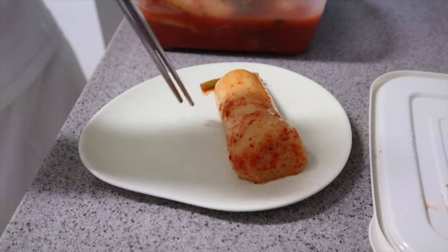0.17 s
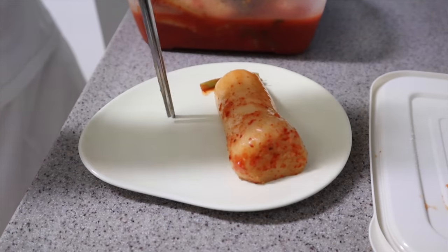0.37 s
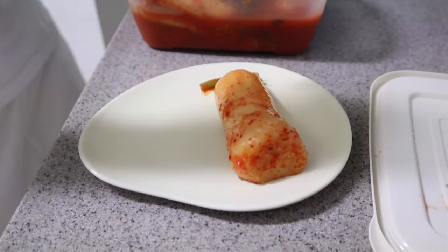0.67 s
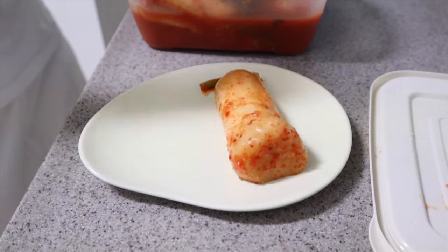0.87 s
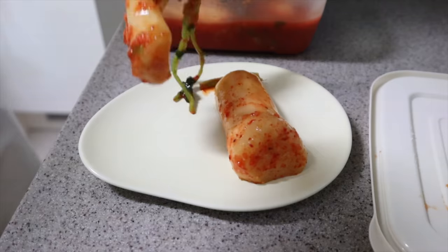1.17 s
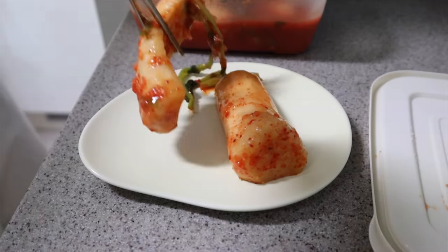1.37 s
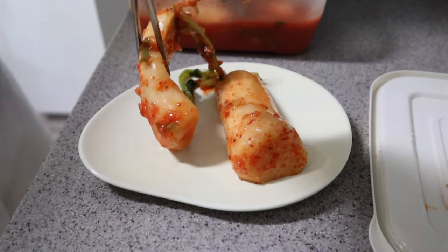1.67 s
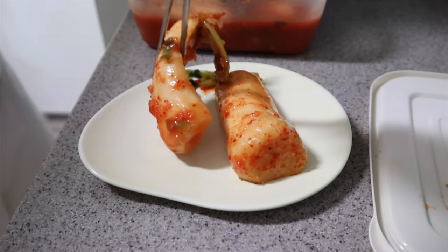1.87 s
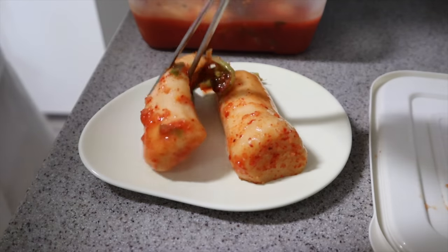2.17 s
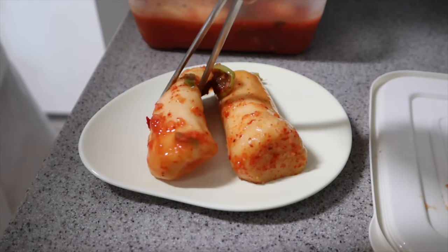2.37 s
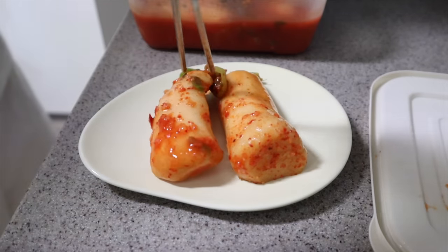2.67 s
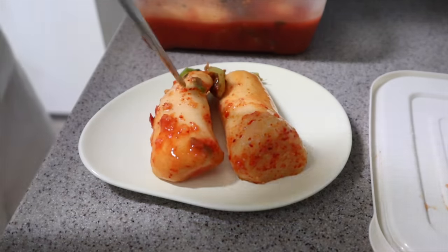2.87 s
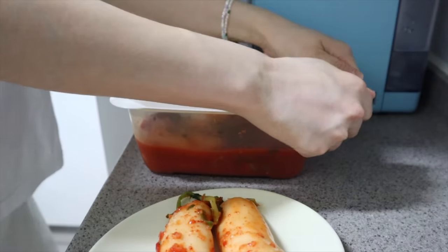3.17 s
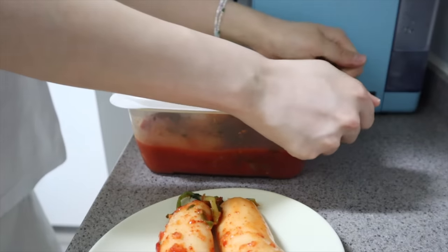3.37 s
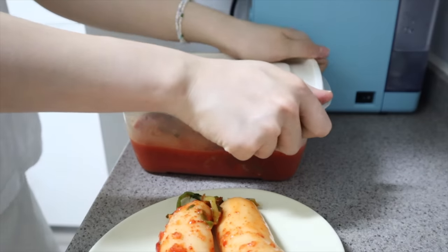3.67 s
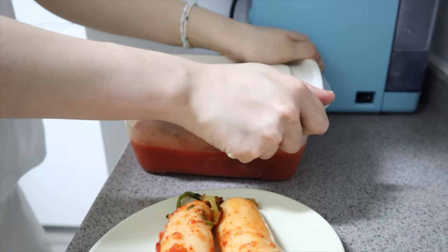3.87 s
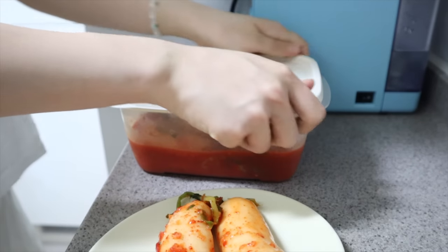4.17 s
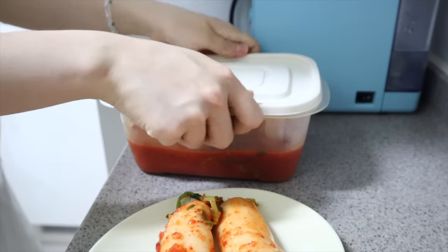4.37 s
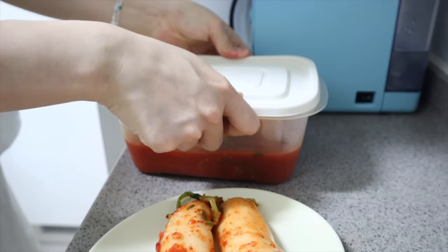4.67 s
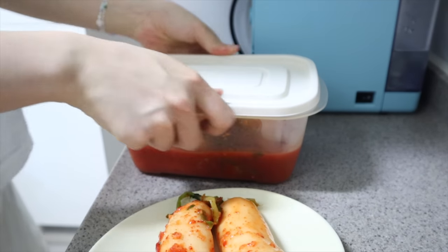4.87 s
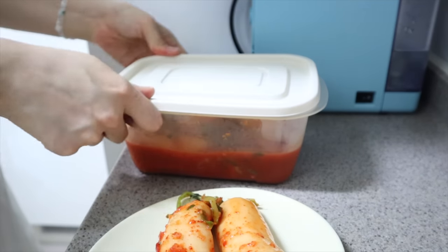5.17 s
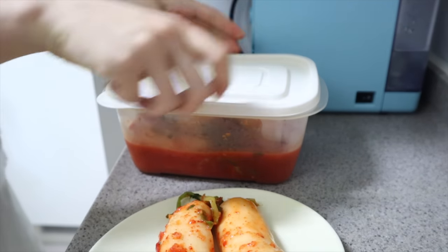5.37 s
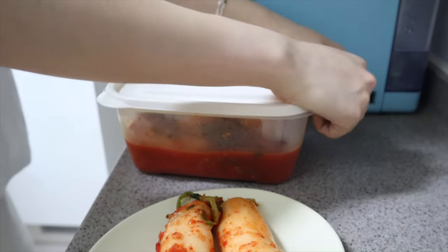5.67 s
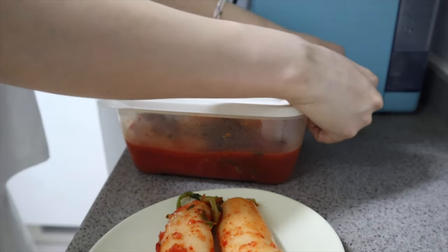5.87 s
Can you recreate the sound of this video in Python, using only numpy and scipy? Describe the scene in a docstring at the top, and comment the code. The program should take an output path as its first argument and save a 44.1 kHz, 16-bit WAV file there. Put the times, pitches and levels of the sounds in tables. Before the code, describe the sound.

Close up in a quiet kitchen with faint low room tone, steel chopsticks strike a ceramic plate twice, bright and short with a small rattle. A few barely audible wet ticks follow as food is set down. Then hands work a plastic lid onto a full tub: soft rubbing, hollow knocks and little clicks, growing firmer, until a loud sharp snap closes it. Stereo microphone nearby, short room reverberation.

```python
"""A quiet kitchen, close up: steel chopsticks tap a ceramic plate twice, wet food ticks,
then hands press a plastic lid onto a tub, which rubs, knocks, clicks and finally snaps shut.
Blows are sums of decaying modes plus bursts of coloured noise; rubbing is swelling noise, part of it
through the modes of the tub; room tone is coloured noise. All is built as middle and side, with the treble
of the plate and tub widened, then reverberated and passed through a level control and a microphone."""
import sys
import numpy as np
from scipy import signal
from scipy.fft import rfft, irfft, next_fast_len
from scipy.io import wavfile
from scipy.ndimage import map_coordinates

SR = 44100
rng = np.random.default_rng(int(sys.argv[2]) if len(sys.argv) > 2 else 0)


def unload_wav(signal):
    """Save mono or channel-first audio to the path in sys.argv[1] as 16-bit WAV at rate SR, clipped to [-1, 1]."""
    wavfile.write(
        sys.argv[1],
        SR,
        np.round(np.clip(np.atleast_2d(signal).T, -1, 1) * 32767).astype(np.int16),
    )


N = 265305

# Lid contacts. Each row: start in seconds, click in dB, treble of the click in dB, knock in dB,
# knock centre in Hz, thump in dB, thump pitch in Hz, ring of thump and hollow as a multiple of their t60.
CONTACTS = [(3.3981, -39, -43.5, -30, 620, -44, 283, 1.5), (3.4468, -37, -57, -27.5, 575, -20, 289, 1.12),
            (3.4914, -37, -38, -20.5, 597, -22.5, 254, 0.94), (3.501, -32, -27.5, -23, 622, -39, 258, .8),
            (3.5194, -46, -32.5, -14, 596, -23, 342, 0.87), (3.608, -38, -55, -36, 580, -36, 285, 0.67),
            (3.626, -55, -65, -30.5, 510, -25, 264, 0.53), (3.6792, -56, -69, -36, 510, -28.5, 280, 0.93),
            (3.7294, -41, -42, -25, 573, -25, 194, 0.4), (3.737, -57, -66, -36, 535, -17, 272.2, 0.89),
            (3.7793, -46, -48, -35, 1300, -19, 287, 0.36), (3.8323, -61, -66, -31, 800, -34, 260, .9),
            (3.845, -64, -68, -37, 515, -27, 257, 0.85), (3.8875, -36, -68, -26.5, 595, -19, 298, 0.49),
            (3.915, -55, -68.5, -30.5, 513, -27, 260, 0.69),
            (4.1107, -20.5, -39, -17.5, 584, -33, 309, 1.16),
            (4.1697, -30.5, -37.5, -24.5, 790, -36, 304, 0.73),
            (4.223, -62, -53, -33, 514, -26.5, 250, 0.67), (4.2849, -32, -26.5, -35, 754, -33, 270, 0.98),
            (4.293, -60, -60, -33, 750, -16, 267, 0.58), (4.3288, -33, -58, -28.5, 638, -46, 300, 0.83),
            (4.436, -42, -60, -34, 736, -54, 330, .8), (4.4829, -40, -50, -22, 639, -23, 264.5, 1.6),
            (4.5338, -26.5, -45, -19.5, 544, -24, 291.2, 1.7),
            (4.5908, -38.5, -65, -27, 505, -22.5, 305, 0.73), (4.8322, -39, -47.5, -39, 580, -39, 296, .9),
            (4.86, -57, -62.5, -31.5, 644, -23.5, 287, 0.89),
            (4.8847, -34, -37.5, -21, 562, -20, 229, 0.67), (4.9, -58, -60, -34, 534, -23, 307, 0.59),
            (5.018, -32.5, -44, -26.5, 595, -25.5, 299, 1), (5.033, -29.5, -39.5, -20, 910, -24, 294, 0.92),
            (5.1121, -16, -26.5, -13, 670, -12, 291, 0.51), (5.1496, -46, -34, -18.5, 580, -29, 284, 0.55),
            (5.172, -56, -58, -23.5, 568, -31, 303, 0.61), (5.2805, -46.5, -64, -37, 574, -44, 280, .9),
            (5.3311, -52, -37.5, -34, 618, -42, 292, 0.95), (5.5855, -39, -46, -30.5, 1225, -54.5, 293, .9),
            (5.6432, -54, -55, -15, 608, -10.5, 184, 0.39), (5.658, -55, -60, -22, 550, -15, 309, 1.12),
            (5.685, -37.5, -37, -24, 587, -20, 290, 1.3), (5.6995, -54, -56, -25, 700, -19, 298, .8),
            (5.7153, -33, -25, -11.5, 690, -21, 306, 0.79), (5.728, -50, -58, -17.5, 766, -15, 292, 0.67),
            (5.7825, -36, -42, -19, 827, -32, 300, 1.1), (5.9176, -11, -23, -1, 940, -11.5, 338, 0.94),
            (5.9293, -26, -47, -7, 537, -14.5, 338, 0.67)]
# Modes of the tub walls and lid. Each row: pitch in Hz, level in dB, t60 in seconds.
WALLS = [(526.6, -4.5, 0.12), (583, -4, 0.056), (642, -3.5, 0.055), (757, -1.5, 0.067), (856, 0.5, 0.03),
         (964, -5, 0.029), (1045, -9.5, 0.047), (1311, -7.5, 0.051), (1470, -25, 0.074), (1690, -10, 0.055),
         (1980, -24, .04), (2140, -24, 0.071), (2480, -23, 0.14)]
# Modes of the air in the tub. Each row: pitch in Hz, level in dB, t60 in seconds.
HOLLOW = [(175.2, 1.5, 0.212), (253, -1, 0.091), (288.3, -1.5, 0.17), (331, -3, 0.146), (358.6, -9.5, 0.11)]
SCATTER_DB = 1.6  # chance in the strength of each tub mode, from blow to blow


def amp(db):
    """Decibels to amplitude."""
    return 10 ** (np.asarray(db) / 20)


def unit(x):
    """Scale each channel to rms 1."""
    return x / np.sqrt(np.mean(x ** 2, axis=-1, keepdims=True) + 1e-20)


def along(points, hz):
    """Read a curve of (Hz, value) points on a log frequency axis."""
    f, v = np.transpose(points)
    return np.interp(np.log(hz + 1), np.log(f + 1), v)


def filtered(x, response):
    """Multiply the spectrum of x by a response of frequency."""
    m = next_fast_len(N + SR // 2)
    return irfft(rfft(x, m) * response(np.fft.rfftfreq(m, 1 / SR)), m)[..., :N]


def noise(spectrum):
    """Two unrelated noises of one colour, rms 1."""
    return unit(filtered(rng.standard_normal((2, N)), lambda hz: amp(along(spectrum, hz))))


def wobble(rate):
    """A smooth random curve, rate knots a second."""
    knots = rng.standard_normal(int(N * rate / SR) + 4)
    return map_coordinates(knots, [np.arange(N) * rate / SR])


def ring(modes, t, scatter_db, attack, rough, centre_hz=None, focus=0, lasts=1, most_db=13.5):
    """One blow as decaying modes, heard by middle and side at their own strengths; peak about 1."""
    hz, db, t60 = np.transpose(modes)[:, :, None]
    if centre_hz:
        # the place of the blow favours modes near one pitch: focus in dB per octave squared, at most most_db
        db = db - np.minimum(focus * np.log2(hz / centre_hz) ** 2, most_db)
    scatter = scatter_db * rng.standard_normal((2, len(modes), 1))
    gain = amp(db + scatter - 60 * t / (t60 * lasts))
    # wandering phase blurs each line
    drift = np.cumsum(rng.standard_normal((len(modes), len(t))), axis=1) * rough
    # the middle starts nearly in step, the side at random
    phase = rng.standard_normal((2, len(modes), 1)) * [[[.35]], [[3]]] + drift
    tone = np.sum(gain * np.sin(2 * np.pi * hz * t + phase), axis=1)
    return tone * (1 - np.exp(-t / attack)) / np.sqrt(2 * np.sum(amp(db) ** 2))


def add(track, s, sound):
    """Mix a sound into a track at time s."""
    part = track[:, round(s * SR):][:, :sound.shape[1]]
    part += sound[:, :part.shape[1]]


def air():
    """Room tone: a low rumble in the middle and a smooth hiss in the side, both gently uneven in level."""
    # Colour of the middle. Each row: frequency in Hz, density in dB per Hz.
    rumble = [(12, -35.5), (20, -7), (40, -6.5), (55, 2), (70, -4), (90, -4.5), (118, -3.5), (161, -10.5),
              (180, -15), (274, -15.5), (362, -19), (565, -19), (1300, -24.5), (1540, -27), (3080, -33.5),
              (8880, -47.5), (12100, -50.5), (15500, -78.5)]
    # Colour of the side. Each row: frequency in Hz, density in dB per Hz.
    hiss = [(12, -63.5), (20, -30.5), (144, -8.5), (180, -5.5), (452, -4), (534, -5.5), (705, -6.5),
            (1200, -8), (2330, -13.5), (14300, -33), (15500, -43)]
    mid, side = noise(rumble)[0], noise(hiss)[0]
    # spaced ports: above 300 Hz the left one lags a little in phase
    lag = filtered(mid, lambda hz: -.3j * (hz > 300))
    level = amp(-45 + 0.2 * wobble(17.0))
    return level * np.array([mid, amp(-3.5) * side + lag])


def kitchen(x):
    """Reverberation: each frequency dies at its own speed; moving hands change the echoes all the time."""
    # Decay of the room. Each row: frequency in Hz, t60 in seconds.
    decay = [(150, 0.56), (1000, 0.39), (4000, 0.11), (12000, 0.031)]
    out, size = np.zeros((2, N)), SR // 7
    for start in range(0, N, size):  # a fresh set of echoes for each slice of sound
        hz, t, z = signal.stft(rng.standard_normal((2, SR // 3)), SR, nperseg=256)
        fading = z * amp(-60 * t / along(decay, hz)[:, None])
        tail = signal.istft(fading, SR, nperseg=256)[1]
        tail /= np.linalg.norm(tail[0])
        add(out, start / SR + .005, signal.fftconvolve(x[:, start:start + size], tail, axes=1))
    return out


def heard(x, side_db, wet_db=-19.5):
    """Room and stereo width: the side mixes the phase-turned middle with a loose part of its own."""
    # How far the side is tied to the middle. Each row: frequency in Hz, share from 0 to 1.
    tied = [(250, .8), (600, .65), (1000, 0.5), (2000, 0.44), (4000, 0.33), (7000, 0.85), (11000, .15)]
    # Phase of that tied part, which puts things a little to the right. Each row: frequency in Hz, turn in radians.
    turn = [(250, 1.9), (600, 2.2), (1000, 3.2), (2000, 2.8), (4000, 3.1), (8000, 4.5)]
    mid, loose = x + amp(wet_db) * kitchen(x)

    def spread(hz):
        share = np.clip(along(tied, hz), 0, 1)
        turned = share * np.exp(1j * along(turn, hz))
        return amp(along(side_db, hz)) * np.array([turned, np.sqrt(1 - share ** 2)])

    edge = filtered(np.array([mid, loose]), spread).sum(axis=0)
    return np.array([mid + edge, mid - edge])


def ticks():
    """Each wet contact is a puff of noise around one pitch, with a fainter clink of the two sticks."""
    # Wet ticks. Each row: start in seconds, puff in dB, pitch in Hz, t60 in seconds, clink in dB.
    wet_ticks = [(.244, -38.5, 8550, 0.042, -50), (.97, -58, 7000, 0.021, -70),
                 (1.002, -44.5, 10200, 0.05, -51), (1.033, -45, 9540, 0.036, -49.5),
                 (1.1548, -35, 7770, 0.041, -36), (1.172, -45, 4610, 0.28, -70),
                 (1.708, -42, 5200, 0.037, -53), (1.807, -36, 2220, 0.033, -68),
                 (1.9585, -49, 6970, 0.02, -59), (2.85, -50, 9080, 0.041, -59),
                 (2.919, -51, 9000, 0.028, -59)]
    # Modes of the two sticks touching. Each row: pitch in Hz, level in dB, t60 in seconds.
    clink = [(4800, -2, .05), (7150, -2, .045), (8590, -0.5, .05), (10000, -1.5, .04), (10860, -1.5, .05),
             (11700, -6, .04)]
    out, t = np.zeros((2, N)), np.arange(SR // 8) / SR
    for s, db, hz, t60, clink_db in wet_ticks:
        add(out, s, amp(clink_db) * ring(clink, t, scatter_db=2.5, attack=.0004, rough=.05))
        b, a = signal.butter(2, [hz * .72, min(hz * 1.3, 12500)], 'bandpass', fs=SR)
        puff = signal.lfilter(b, a, rng.standard_normal((2, len(t))))
        add(out, s, amp(db - 60 * t / np.clip(t60, .004, .3)) * puff)
    return out


def taps():
    """Steel tips strike the glaze: plate and stick modes, a crack, a rattle, a counter knock, a fading buzz."""
    # Chopstick taps. Each row: start in seconds, strength in dB, rattle t60 in seconds, low knock in dB,
    # buzz in dB, buzz t60 in seconds, buzz hold in seconds, favoured pitch in Hz.
    strikes = [(0.3432, 2, .03, -20.5, -24.5, .45, .135, 4350),
               (0.491, 1.5, 0.025, -17, -22, 0.22, 0.082, 2938)]
    # Modes of the plate. Each row: pitch in Hz, level in dB, t60 in seconds.
    plate = [(628, -2.5, 0.065), (910, -18, 0.299), (926, -8.5, 0.1), (1019, -14, 0.084),
             (1090, -19, 0.088), (1193, -16, .08), (1534, -7.5, 0.045), (1647, -16, 0.077),
             (1734, -18.5, 0.054), (1818, -16, 0.06), (2025, -19, 0.069), (2150, -11, 0.045),
             (2304, -14.5, 0.042), (2401, -22.5, 0.071), (2730, -13.5, 0.023), (2927, -5.5, 0.039),
             (3040, -9, .04), (3106, -4.5, 0.023), (3181, 0.5, 0.03557), (3275, -8.5, 0.036),
             (3564, -8, 0.033), (3620, -9.5, 0.0396), (3803, -3, 0.05), (3848, 0, 0.0351),
             (4097, -13, 0.042), (4540, -17.5, 0.024), (4960, -9.5, 0.023), (5074, -0.5, 0.024),
             (5170, -5.5, 0.02), (6116, -12, 0.034)]
    # Modes of the steel sticks, a short, slightly blurred ring. Each row: pitch in Hz, level in dB, t60 in seconds.
    sticks = [(3060, 6, 0.17), (3224, -3, 0.15), (3400, -7, .14), (3742, 0, 0.15), (5160, -8.5, .17),
              (5170, -7.5, 0.15), (5990, -14.5, 0.179), (6160, -17, .15), (7196, -5.5, 0.11),
              (8080, -19.5, 0.0797), (9060, -8, 0.11), (10070, -9.5, .12), (10470, -5.5, 0.081),
              (10360, -11.5, .1), (11170, -11.5, .1), (11675, -11.5, 0.097), (11930, -10.5, .09),
              (12960, -19, .04)]
    # Rattle of the two sticks against the glaze. Each row: frequency in Hz, density in dB per Hz.
    clatter = [(88, -51), (150, -27.5), (634, -18), (1280, -18.5), (1550, -10.5), (2430, -20), (3810, -6.5),
               (4370, -11.5), (5150, 2), (5400, -20.5), (8470, -36.5), (10700, -22.5), (13000, -26),
               (15800, -30.5)]
    # Buzz of the plate on the counter. Each row: frequency in Hz, density in dB per Hz.
    plain_buzz = [(150, -41), (250, -10), (681, 1.5), (1170, 3), (2710, -8.5), (3110, -11), (3840, -14),
                  (4410, -32), (5000, -16), (6500, -39.5), (11000, -120)]
    # How strongly the buzz drives the modes. Each row: frequency in Hz, drive in dB.
    drive = [(600, 8), (1200, 9), (2000, 6), (3000, 1), (4400, -6), (5200, -0.5), (7000, -6), (12000, -10)]
    knock = [(174.3, -2.0, 0.087), (340, 1.0, 0.082)]  # counter modes: Hz, dB, t60 in seconds
    stop_t60 = .09  # seconds, extra fading of the buzz after its hold, as the stick lifts or damps it
    out, t = np.zeros((2, N)), np.arange(SR // 3) / SR
    gate = np.zeros((2, N))  # levels of rattle and buzz
    for s, db, rattle_t60, knock_db, buzz_db, buzz_t60, hold, centre_hz in strikes:
        rattle_level = amp(db - 6.5 - 60 * t / rattle_t60)
        buzz_level = amp(buzz_db - 60 * t / buzz_t60 - 60 * np.maximum(t - hold, 0) / stop_t60)
        add(gate, s, np.array([rattle_level, buzz_level]))
        add(out, s, amp(db - 14.5 - 60 * t / 0.0027) * rng.standard_normal((2, len(t))))  # crack
        add(out, s, amp(db + 5.5) * ring(plate, t, scatter_db=2.5, attack=0.00077, rough=0.0094,
                                         centre_hz=centre_hz, focus=2.4))
        add(out, s, amp(db - 22.5) * ring(sticks, t, scatter_db=3.5, attack=0.0001896, rough=.016))
        add(out, s, amp(knock_db) * ring(knock, t, scatter_db=1.3, attack=0.00037, rough=0.016))

    def driven(f):
        """Each mode as a peak 2.2 % of its pitch wide, at most 220 Hz."""
        peaks = sum(amp(db / 2) / (1 + (2 * (f - c) / min(c * .022, 220)) ** 2) for c, db, _ in plate + sticks)
        return peaks * amp(along(drive, f))

    shaking = amp(2.5 * wobble(70)) * rng.standard_normal((2, N))
    modes = unit(filtered(shaking, driven))
    return out + gate[0] * noise(clatter) + gate[1] * unit(noise(plain_buzz) + amp(4) * modes)


def counter():
    """The base of the tub rocks down on the counter, and every thump shakes the counter a little."""
    # Rocking of the base. Each row: start in seconds, level in dB.
    bumps = [(3.4461, -23.5), (3.629, -48), (4.1105, -35), (4.5337, -29.5), (4.862, -27.5), (5.1516, -24),
             (5.28, -31.5), (5.645, -43), (5.688, -17.5), (5.7823, -26.5), (5.918, 2), (5.928, -3.5),
             (5.939, -13.5)]
    # Modes of the counter under the tub. Each row: pitch in Hz, level in dB, t60 in seconds.
    boards = [(56, 1.5, 0.49), (84.9, -5, 0.13), (107.5, 1, 0.059), (119.7, 7, 0.27), (152, 2.5, 0.25)]
    under_thump_db = 14.5
    out, t = np.zeros((2, N)), np.arange(SR // 4) / SR
    shakes = [(s, thump_db - under_thump_db) for s, *_, thump_db, _, _ in CONTACTS]
    for s, db in bumps + shakes:
        add(out, s, amp(db) * ring(boards, t, scatter_db=0.95, attack=0.0017, rough=0.008))
    return out


def rub():
    """Skin and rim slide on plastic in a grainy hiss; the tub modes drone with it, and after knocks and the snap."""
    # Strokes, and last the hiss and drone left ringing by the final snap.
    # Each row: peak time in seconds, rise in seconds, fall in seconds, hiss in dB, drone in dB.
    swells = [(3.345, 0.13, 0.19, -65, -56), (3.517, 0.24, 0.22, -41, -44.5),
              (3.61, .06, 0.067, -61, -51.5), (3.736, 0.044, 0.14, -53, -42.5),
              (3.914, 0.16, 0.027, -76, -49), (4.116, 0.046, 0.14, -45, -38),
              (4.278, 0.15, 0.19, -35, -44.5), (4.439, 0.052, 0.027, -43, -39.5),
              (4.526, 0.25, 0.21, -68, -45), (4.892, 0.14, 0.044, -51, -44.5),
              (5.033, 0.18, 0.11, -47.5, -59), (5.155, 0.048, 0.015, -63, -28.5),
              (5.334, 0.11, 0.04, -47, -40.5), (5.642, 0.15, 0.25, -47.5, -42),
              (5.722, 0.0068, 0.0065, -32, -25), (5.824, 0.062, 0.06, -53, -48),
              (5.917, 0.0062, 0.053, -37, -13.5)]
    # Colour of the sliding hiss. Each row: frequency in Hz, density in dB per Hz.
    slide = [(710, -49), (1200, -8), (1320, 3.5), (1430, -27), (1970, -5.5), (2620, 1.5), (3030, -3),
             (4160, 0.5), (5110, -2.5), (10500, -2.5), (12100, -9), (14000, -38)]
    swell_db, drone_lingers = 26.5, 1.31  # dB over a rise or fall; the drone falls that many times slower
    shiver_under_knock_db, shiver_t60 = 23, 0.145  # the walls keep droning after a knock; t60 in seconds
    now = np.arange(N) / SR
    level = np.zeros((2, N))  # levels of hiss and drone
    for s, rise, fall, hiss_db, drone_db in swells:
        falls = fall * np.array([[1], [drone_lingers]])
        away = np.maximum((s - now) / rise, (now - s) / falls)
        level += amp([[hiss_db], [drone_db]] - swell_db * away)
    for s, _, _, knock_db, *_ in CONTACTS:
        add(level[1:], s, amp(knock_db - shiver_under_knock_db - 60 * now[None, :SR // 3] / shiver_t60))

    def body(f):
        """Resonances of the tub, each 4 / t60 Hz wide before the scaling of angular frequency."""
        return sum(amp(db) * 1j * f * 30 / (c * c - f * f + 1j * f * 4 / t60) for c, db, t60 in HOLLOW + WALLS)

    grain = amp(3 * wobble(60) + 2.8 * wobble(450))
    lumps = amp(3 * wobble(40))
    drone = unit(lumps * filtered(rng.standard_normal((2, N)), body))
    return level[0] * unit(grain * noise(slide)) + level[1] * drone


def twangs():
    """The rim of the lid twangs as a catch slips: a narrow choice of its modes rings briefly."""
    # Slips. Each row: start in seconds, level in dB, favoured pitch in Hz, ring as a multiple of the rim's t60.
    slips = [(3.399, -34, 1100, .6), (3.4466, -37, 1480, .6), (3.4907, -28, 1310, 0.72),
             (3.5009, -29, 2300, 0.65), (3.5175, -34, 1250, .8), (3.6062, -33, 2250, 0.55),
             (3.729, -36, 2600, 0.91), (3.739, -38, 2540, .6), (3.779, -40, 1320, 1),
             (3.8876, -38, 2570, 1.1), (4.1102, -29, 2560, 0.73), (4.16, -24, 1080, .5),
             (4.286, -26, 2650, 0.52), (4.3279, -36, 1330, 1.2), (4.358, -35, 2570, 0.71),
             (4.418, -33.5, 1300, 1.5), (4.5341, -34, 2100, 0.53), (4.8324, -34, 2560, .6),
             (4.877, -41, 2600, 0.72), (4.8826, -22, 1140, 0.76), (5.0176, -27, 1360, 1.1),
             (5.033, -29, 1340, 1.1), (5.1118, -21, 1330, 0.78), (5.1508, -27, 1640, .7),
             (5.3, -35, 1200, .6), (5.315, -37, 1600, .6), (5.6835, -36, 2070, .8),
             (5.7145, -21, 2230, 0.91), (5.716, -24, 1330, .6), (5.721, -21, 1560, 0.64),
             (5.7826, -23, 1310, 0.47), (5.786, -27.5, 1540, 0.45), (5.9175, -5.5, 1280, 0.36),
             (5.9155, -13, 3900, 0.33), (5.9286, -14, 1580, 1.5), (5.936, -17, 2100, 0.81),
             (5.947, -23, 1580, 0.9)]
    # Modes of the rim. Each row: pitch in Hz, level in dB, t60 in seconds.
    rim = [(1100, -1, 0.034), (1213, 3, 0.035), (1315, 5, .06), (1535, 8, .06), (1600, 2, 0.1),
           (1855, -6, 0.043), (2107, 2, 0.056), (2314, -1.5, 0.063), (2578, 3, .07), (2860, -2, 0.033),
           (3160, -10, .04), (3640, -21, 0.031), (4020, 0, 0.061)]
    out, t = np.zeros((2, N)), np.arange(SR // 4) / SR
    for s, db, centre_hz, lasts in slips:
        add(out, s, amp(db) * ring(rim, t, SCATTER_DB, attack=.0006, rough=.015, centre_hz=centre_hz,
                                   focus=200, lasts=lasts, most_db=19))
    return out


def lid():
    """Every contact clicks, knocks the walls and the panel under the finger, and thumps the hollow tub."""
    # Low part of a click. Each row: frequency in Hz, density in dB per Hz.
    snap = [(880, -3), (1350, 1), (1700, -9), (2100, -3), (2350, -7), (2620, -2.5), (2900, -7.5),
            (5000, -12), (6500, -75), (11000, -120)]
    # Treble of a click. Each row: frequency in Hz, density in dB per Hz.
    click = [(2940, -4), (5000, 1), (5960, -1), (10500, -7), (12700, -16), (15500, -69)]
    click_t60, panel_t60, thump_t60 = 0.039, .06, .13  # seconds
    panel_under_knock_db, hollow_under_thump_db = 2.5, 6.5
    out, t = np.zeros((2, N)), np.arange(SR // 4) / SR
    gate = np.zeros((2, N))  # levels of the low part and the treble of the clicks
    for s, click_db, treble_db, knock_db, centre_hz, thump_db, thump_hz, lasts in CONTACTS:
        add(gate, s, amp([[click_db], [treble_db]] - 60 * t / click_t60))
        walls = ring(WALLS, t, SCATTER_DB, attack=0.00063, rough=0.015, centre_hz=centre_hz, focus=6.6)
        add(out, s, amp(knock_db) * walls)
        # the pressed lid sets the pitch of the panel and of the thump
        panel = ring([(centre_hz, 0, panel_t60)], t, SCATTER_DB, attack=0.0021, rough=0.013)
        add(out, s, amp(knock_db - panel_under_knock_db) * panel)
        thump = ring([(thump_hz, 0, thump_t60)], t, SCATTER_DB, attack=0.0031, rough=0.019, lasts=lasts)
        add(out, s, amp(thump_db) * thump)
        hollow = ring(HOLLOW, t, SCATTER_DB, attack=0.0042, rough=0.023, lasts=lasts)
        add(out, s, amp(thump_db - hollow_under_thump_db) * hollow)
    return out + gate[0] * noise(snap) + gate[1] * noise(click)


def scene():
    """Plate and tub, each with its own stereo width, over the room tone."""
    # Width of the plate sounds. Each row: frequency in Hz, side over middle in dB.
    plate_side = [(60, -9.5), (110, -13.5), (200, -19), (380, -8.5), (700, -13), (1290, -0.5), (2380, -0.5),
                  (4400, -7.5), (8120, 7.5), (15000, 2.5)]
    # Width of the tub sounds. Each row: frequency in Hz, side over middle in dB.
    tub_side = [(60, -27), (110, -27), (200, -22), (380, -13.5), (700, -7.5), (1290, -4), (2380, 0),
                (4400, 2.5), (8120, 5), (15000, 8)]
    mid, side = air()
    room_tone = np.array([mid + side, mid - side])
    plate = heard(ticks() + taps(), plate_side)
    tub = heard(counter() + rub() + twangs() + lid(), tub_side)
    return room_tone + plate + tub


def record(dry):
    """Gain control ducks after loud sounds and recovers slowly; peaks clip softly; the band ends sharply."""
    # Thin bottom and dull top of the microphone. Each row: frequency in Hz, gain in dB.
    mic = [(22, -6.5), (45, 0), (10000, -0.5), (12500, -4), (15500, -18.5)]
    top_hz, edge_hz = 16500, 400  # end of the band and width of its slope
    keep = np.exp(-1 / (.16 * SR))  # the power is averaged over about 0.16 s
    memory = signal.lfilter([1 - keep], [1, -keep], np.mean(dry ** 2, axis=0))
    ducked = dry * (1 + memory / amp(-28.5) ** 2) ** -.17
    clipped = ducked / (1 + np.abs(ducked) ** 6) ** (1 / 6)
    return filtered(clipped, lambda hz: amp(along(mic, hz)) * np.clip((top_hz - hz) / edge_hz, 0, 1) ** 2)


dry = scene()
out = record(dry)
unload_wav(out)
```